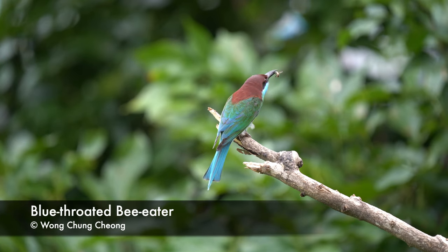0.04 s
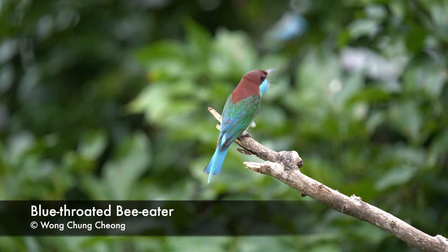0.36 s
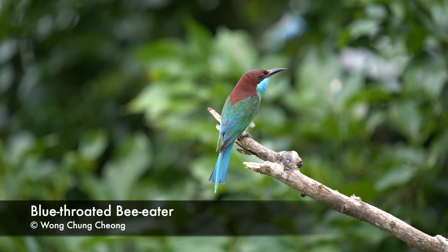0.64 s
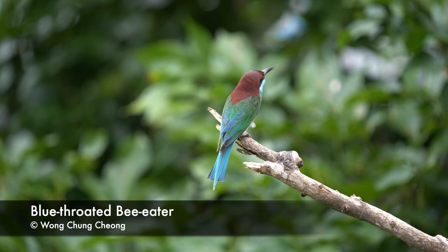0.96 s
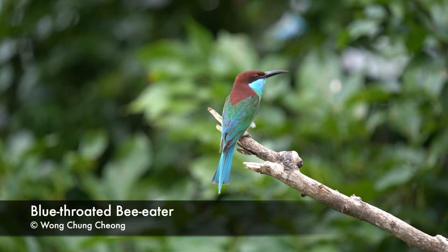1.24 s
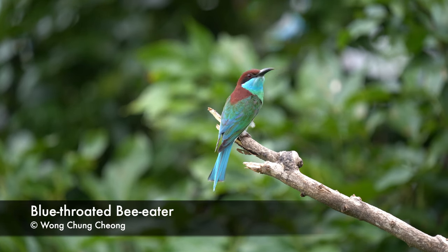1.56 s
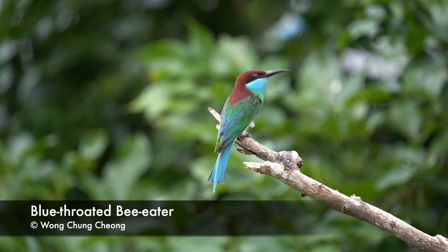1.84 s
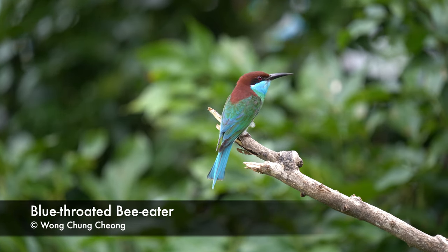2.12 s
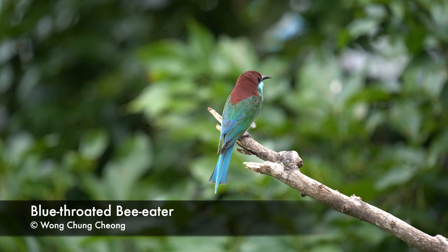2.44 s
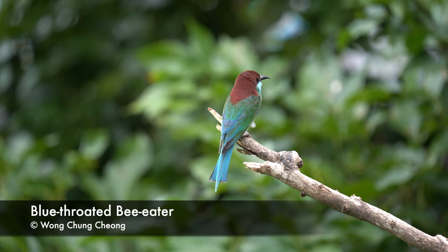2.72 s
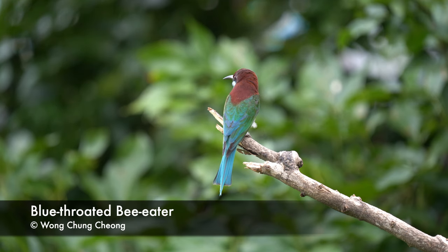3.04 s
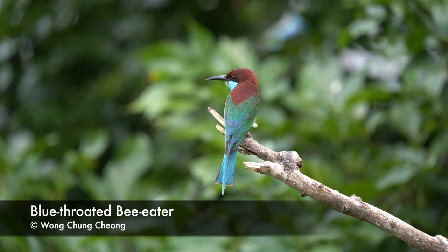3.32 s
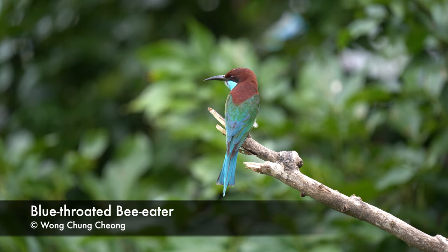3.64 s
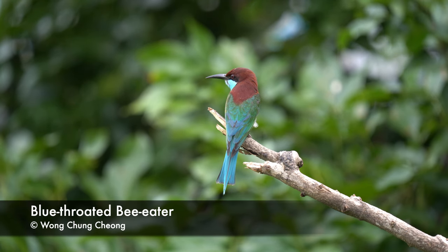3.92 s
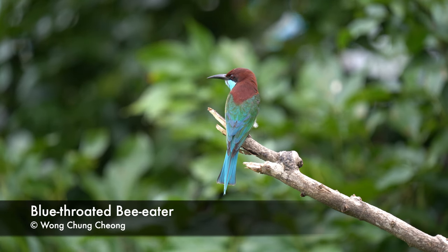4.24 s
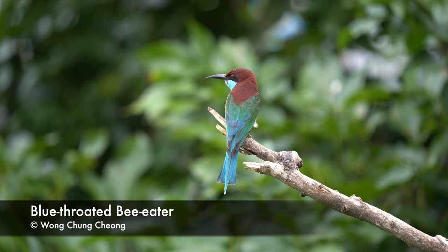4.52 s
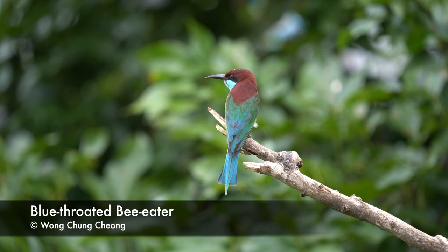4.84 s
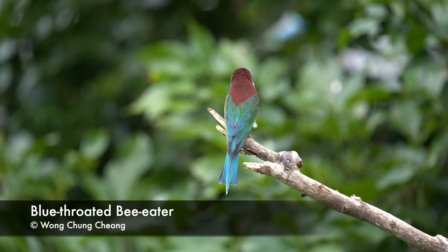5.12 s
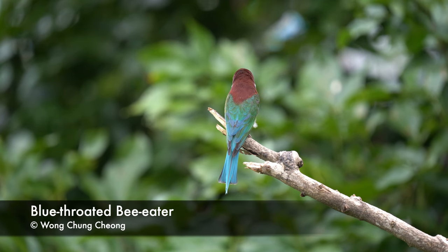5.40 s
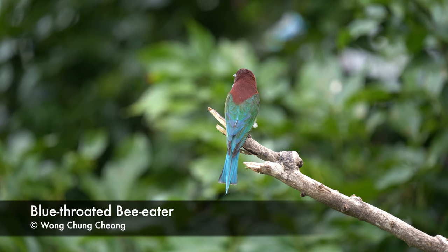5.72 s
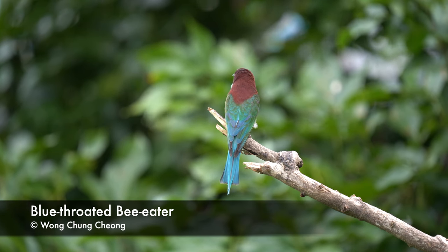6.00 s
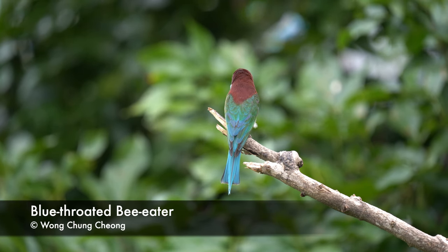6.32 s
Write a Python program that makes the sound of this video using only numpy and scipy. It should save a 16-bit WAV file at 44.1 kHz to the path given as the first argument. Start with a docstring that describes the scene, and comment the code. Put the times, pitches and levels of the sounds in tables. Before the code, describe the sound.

Distant traffic rumbles beneath a soft leafy hiss and shrill cicadas, while faint birds pip, trill and whistle among the trees.

```python
"""Distant traffic rumbles under a wash of road and foliage while cicadas buzz high up in a wooded park.
Two cicadas click their tymbals to ring their bodies; a chorus behind them merges into a hiss.
Birds trill, call thinly, pip, whistle slurred phrases, chirp, peep and twitter: each note is a
gliding near sine, echoed by trunks and leaves. Short fluttering swishes of noise come from the left,
the last a bird's squawk."""
import sys
import numpy as np
from scipy import signal
from scipy.fft import rfft, irfft
from scipy.io import wavfile

SR = 44100
rng = np.random.default_rng(int(sys.argv[2]) if len(sys.argv) > 2 else 0)


def inscribe(sig):
    """Save sig as 16-bit PCM at rate SR to the path in sys.argv[1].

    A 1-D sig is mono; a 2-D sig holds one channel per row.
    Samples are clipped to [-1, 1] before scaling.
    """
    pcm = np.round(np.clip(np.atleast_2d(sig).T, -1, 1) * 32767)
    wavfile.write(sys.argv[1], SR, pcm.astype(np.int16))


N = 289296
TIME_S = np.arange(N) / SR

# Diffuse background. Each row: frequency in Hz, left-right correlation.
DIFFUSE_CORRELATION = [(40, .9995), (85, .998), (170, .992), (350, .95), (700, .55), (1400, .14),
                       (3000, -.05), (5500, -.25), (9000, -.05), (15000, 0)]
# Its balance. Each row: frequency in Hz, left over right in dB.
DIFFUSE_BALANCE = [(60, 0), (180, -.3), (350, -2.3), (700, -4.4), (1400, -2.4), (3000, -1.8), (6000, -1),
                   (14000, 0)]
# Noise spectra of traffic, far wash and swishes. Each row: frequency in Hz, relative density in dB.
RUMBLE_SPECTRUM = [(18, -44), (24, -17), (33, -18), (39, 0), (50, -0.5), (80, -3), (110, -3), (150, -4.5),
                   (180, -9.5), (240, -13.5), (340, -17), (390, -24.5), (450, -31.5)]
WASH_SPECTRUM = [(250, -16.5), (450, 2.5), (700, -1), (1000, -4), (1500, -7.5), (2200, -11.5), (2900, -12),
                 (3600, -17.5), (4600, -17.5), (5600, -18), (7500, -20.5), (12500, -27.5), (15500, -29.5)]
SWISH_SPECTRUM = [(1000, -5), (2200, 8.5), (3800, 5), (5600, 6), (7000, 2), (10000, -13), (15000, -27)]
# Engines. Each row: frequency in Hz, width in Hz, level in dB.
ENGINE_DRONES = [(51.1, 0.86, -41.5), (73.16, 1.85, -38), (94.85, 2.6, -39.5), (202.7, 5, -50),
                 (350.2, 5.7, -57.5)]
# Far wash. Each row: time in seconds, relative level in dB.
WASH_ENVELOPE = [(0.05, -49.5), (0.99, -52), (4.68, -50), (6.12, -51), (6.38, -52.5), (6.4, -50)]
# Cicada body resonances. Each row: frequency in Hz, relative gain in dB.
STEADY_SPECTRUM = [(9900, -33), (10400, -1), (10800, -22), (11000, 1.5), (11180, 1.5), (11340, -6),
                   (11500, -1.5), (11800, -23), (12200, -38)]
SWELLING_SPECTRUM = [(7500, -23), (8100, -9), (8550, -12), (8800, -5), (9000, 2.5), (9300, -9.5),
                     (9900, -4), (10600, -30)]
CHORUS_SPECTRUM = [(8600, -27.5), (9300, -13), (9600, -6.5), (9800, -2), (10100, -9), (10500, -13),
                   (11300, -24.5), (12000, -37)]
# Swelling cicada. Each row: peak time in seconds, level in dB.
CICADA_SWELLS = [(.37, -57), (1.39, -56.5), (2.39, -56), (3.43, -57), (4.43, -57.5), (5.41, -58.5),
                 (6.41, -58.5)]
# Cicada chorus. Each entry: peak time of a surge in seconds.
SURGE_PEAKS_S = [.8, 1.97, 3.12, 4.15, 5.15, 6.2]
# Trills. Each row: start in seconds, number of ticks.
TRILL_RUNS = [(.089, 9), (3.21, 4)]
# Thin calls. Each row: start in seconds, length in seconds, pitch in Hz, level in dB, waver as a share.
THIN_NOTES = [(.18, .11, 5180, -68, .06), (.22, .07, 7080, -66, .012), (1.217, .04, 5490, -60, .025),
              (1.498, .21, 4840, -64, .1), (2.1, 0.2, 5000, -65, 0.072), (2.127, .07, 3630, -60.5, .025),
              (2.144, .055, 7270, -62, .012), (4.117, .08, 7050, -61, 0.037), (5.24, .13, 5100, -64, .06),
              (6.335, .04, 6760, -63, .008)]
# Swishes. Each row: peak time in seconds, Gaussian sigma in seconds, level in dB.
NOISY_SWISHES = [(.25, .08, -65), (1.58, 0.064, -76), (2.22, 0.036, -59), (3.066, 0.086, -53.5),
                 (3.37, 0.042, -52.5), (4.19, 0.066, -56), (4.723, 0.055, -48), (6.294, 0.079, -49)]
# Singer's falling notes. Each row: start in seconds, length in seconds, middle pitch in Hz,
# bow as a share of pitch, relative level in dB.
FALLING_NOTES = [(0.424, 0.036, 2630, .025, -53.5), (.49, 0.055, 2880, .01, -56),
                 (1.794, 0.056, 2710, 0.017, -53.5), (1.868, 0.056, 2910, 0.008, -58),
                 (2.324, 0.053, 2826, 0.029, -49), (3.104, 0.054, 2850, 0.022, -48.5),
                 (3.533, 0.086, 2790, 0.015, -54.5), (3.642, 0.052, 2950, .01, -54),
                 (3.822, .056, 2805, 0.023, -49), (4.04, .06, 2920, 0, -58.5),
                 (4.419, 0.04, 2930, -0.0018, -50), (4.719, 0.08, 2810, 0, -52),
                 (4.935, 0.059, 2774, .01, -43.5), (5.019, 0.0595, 2940, -0.026, -41.5),
                 (5.2, 0.038, 2640, .01, -52.5), (5.307, .1, 2790, 0.018, -45),
                 (5.435, .069, 2840, 0.026, -46), (5.65, 0.069, 2920, .025, -50.5)]
# Singer's rising notes, then the twitters. Each row: start in seconds, length in seconds,
# middle pitch in Hz, rise either side as a share of pitch, relative level in dB.
RISING_NOTES = [(2.288, .03, 2650, .04, -56), (4.302, 0.074, 2640, 0.036, -52),
                (4.385, .03, 2985, .015, -53), (4.9, 0.043, 2720, .04, -50), (4.994, 0.029, 2830, .05, -46),
                (5.236, 0.041, 2560, 0.021, -46), (5.29, 0.021, 3010, 0.13, -46.5),
                (5.405, 0.0364, 3000, .09, -46.5), (5.511, .04, 2876, 0.035, -50),
                (5.541, 0.049, 2740, 0.049, -45.5), (5.6, .06, 2730, .02, -53)]
TWITTER_NOTES = [(2.486, .035, 3050, 0.0034, -52), (2.53, 0.026, 2830, 0.1, -50),
                 (5.919, 0.064, 2757, -0.0091, -51.5), (6.234, 0.044, 2830, .07, -52.5),
                 (6.274, 0.0893, 1630, -.07, -50), (6.294, 0.015, 2640, .05, -45.5),
                 (6.319, 0.022, 4560, 0, -46), (6.333, 0.054, 3300, -0.044, -47.5),
                 (6.345, 0.113, 1630, .04, -53.5), (6.383, 0.041, 3130, 0, -56)]
# Chirps. Each row: start in seconds, top pitch in Hz, level in dB.
ARCHED_CHIRPS = [(0.559, 4230, -53), (0.873, 4220, -52.5), (1.259, 4150, -53), (2.719, 4230, -47.5),
                 (3.055, 4280, -50.5), (5.638, 4180, -51), (5.931, 4320, -51)]
# One chirp. Each row: share of length, share of top pitch, gain in dB.
CHIRP_CONTOUR = [(0, .87, -6), (.2, .97, -1), (.4, 1, 1), (.6, .96, 2), (.8, .86, -2), (1, .76, -7)]
# Peeps. Each entry: start in seconds.
PEEP_STARTS_S = [.762, 1.122, 1.917]


def from_db(db):
    return 10 ** (np.asarray(db) / 20)


def unit_rms(x):
    return x / np.sqrt(np.mean(x ** 2) + 1e-20)


def per_bin(points):
    """Interpolate onto the FFT bins over log frequency."""
    hz, value = np.transpose(points)
    return np.interp(np.log(np.maximum(np.fft.rfftfreq(N, 1 / SR), 1)), np.log(hz), value)


def colour(x, spectrum):
    """Filter by a spectrum, 40 dB down an octave past each end; rms 1."""
    low, high = spectrum[0], spectrum[-1]
    closed = [(low[0] / 2, low[1] - 40), *spectrum, (high[0] * 2, high[1] - 40)]
    return unit_rms(irfft(rfft(x) * from_db(per_bin(closed)), N))


def pan(left_db):
    return from_db(np.array([[left_db], [-left_db]]) / 2)


def arrive(x, left_lead_s):
    """Sound reaches the nearer microphone first."""
    phase_rad = np.pi * np.outer([1, -1], np.fft.rfftfreq(N, 1 / SR)) * left_lead_s
    return irfft(rfft(x) * np.exp(1j * phase_rad), N)


def drift(corner_hz, hop=32):
    """Low-passed noise, rms 1."""
    size = N // hop + 2
    hz = np.fft.rfftfreq(size, hop / SR)
    slow = unit_rms(irfft(rfft(rng.standard_normal(size)) / (1 + (hz / corner_hz) ** 2), size))
    return np.interp(np.arange(N) / hop, np.arange(size), slow)


def add(out, start_s, sound):
    i = max(round(start_s * SR), 0)
    out[:, i:i + sound.shape[-1]] += sound[..., :N - i]


def diffuse(spectrum):
    """Noise from all round: alike at both microphones in the bass, unrelated in the treble."""
    mid, side = rfft(rng.standard_normal((2, N)))
    correlation = np.clip(per_bin(DIFFUSE_CORRELATION), -1, 1)
    signs = np.array([[1], [-1]])
    pair = np.sqrt(1 + correlation) * mid + np.sqrt(1 - correlation) * side * signs
    balance = from_db(signs * per_bin(DIFFUSE_BALANCE) / 2)
    return colour(irfft(pair * balance, N), spectrum)


def traffic(rumble_db=-32.4):
    """Deep rumble with unsteady engine drones."""
    out = from_db(rumble_db) * diffuse(RUMBLE_SPECTRUM)
    for hz, width_hz, level_db in ENGINE_DRONES:
        phase_rad = 2 * np.pi * hz * TIME_S
        drone = drift(width_hz) * np.cos(phase_rad) + drift(width_hz) * np.sin(phase_rad)
        out += from_db(level_db) * unit_rms(drone)
    return out


def far_wash(gain_db=4.5):
    """Broad noise of far road and foliage."""
    level_db = np.interp(TIME_S, *np.transpose(WASH_ENVELOPE)) + gain_db
    return from_db(level_db) * diffuse(WASH_SPECTRUM)


def tymbal_buzz(body, pulse_hz, jitter_s, smear_db, left_db):
    """Each tymbal buckling clicks, slightly off the beat, and rings the body; foliage smears part."""
    beats_s = np.arange(0, N / SR, 1 / pulse_hz)
    clicks_s = beats_s + jitter_s * rng.standard_normal(len(beats_s))
    clicks = np.bincount(np.clip(clicks_s * SR, 0, N - 1).astype(int), minlength=N).astype(float)
    direct = unit_rms(arrive(clicks, left_lead_s=-94e-6))
    smear = from_db(smear_db) * rng.standard_normal((2, N))
    return pan(left_db) * colour(direct + smear, body)


def steady_cicada(hold_db=-59.5, rest_db=-80, resume_db=-67.5, recovery_db_per_s=8):
    """Even buzz on the right: holds, rests once, resumes softly and recovers."""
    stop_s, resume_s, switch_s = 5.295, 5.87, .04
    level_db = np.interp(TIME_S, [stop_s, stop_s + switch_s, resume_s, resume_s + switch_s],
                         [hold_db, rest_db, rest_db, resume_db])
    level_db += recovery_db_per_s * np.maximum(TIME_S - resume_s, 0)
    buzz = tymbal_buzz(STEADY_SPECTRUM, pulse_hz=144.1, jitter_s=20e-6, smear_db=-5, left_db=-13)
    return from_db(level_db) * buzz


def swelling_cicada(climb_db_per_s=9, fall_db_per_s=130):
    """Buzz on the right that climbs and breaks off about once a second."""
    swells_db = [db - np.maximum(climb_db_per_s * (s - TIME_S), fall_db_per_s * (TIME_S - s))
                 for s, db in CICADA_SWELLS]
    buzz = tymbal_buzz(SWELLING_SPECTRUM, pulse_hz=95.3, jitter_s=200e-6, smear_db=4, left_db=-7)
    return from_db(np.max(swells_db, axis=0)) * buzz


def cicada_chorus(base_db=-54, surge_db=2.5, sigma_s=.13):
    """Far clicks merge into a gently surging hiss."""
    surges = sum(np.exp(-.5 * ((TIME_S - s) / sigma_s) ** 2) for s in SURGE_PEAKS_S)
    hiss = pan(left_db=-6.2) * colour(rng.standard_normal((2, N)), CHORUS_SPECTRUM)
    return from_db(base_db + surge_db * surges) * hiss


def whistle(track_hz, waver, fade):
    """Near sine. Waver, a share of pitch, makes it rasp; fade is the tapered share of its length."""
    wobble = np.interp(np.arange(len(track_hz)) / SR, np.arange(128) / 500, rng.standard_normal(128))
    phase_rad = 2 * np.pi * np.cumsum(track_hz * (1 + waver * wobble)) / SR
    return signal.windows.tukey(len(track_hz), np.clip(fade, .1, 1)) * np.sin(phase_rad)


def slur(length_s, middle_hz, rise, bow, waver, fade):
    """Parabolic glide. Rise tilts it and bow lifts both ends, each as a share of the middle pitch."""
    anchors_hz = middle_hz * np.array([1 - rise + bow, 1, 1 + rise + bow])
    parabola = np.polyfit([0, .5, 1], anchors_hz, 2)
    return whistle(np.polyval(parabola, np.linspace(0, 1, int(length_s * SR))), waver, fade)


def perch(notes, left_db):
    """Place notes at one bearing. Each note: start in seconds, level in dB, sound."""
    out = np.zeros((2, N))
    for start_s, level_db, sound in notes:
        add(out, start_s, from_db(level_db) * pan(left_db) * sound)
    return out


def far_chatter(max_db=-61.5, spread_db=10, count=110, low_hz=2600, high_hz=3400):
    """Birds deep in the trees: faint slurs at random times, pitches and bearings."""
    out = np.zeros((2, N))
    for when, height, slope, loudness, side in rng.random((count, 5)):
        hz = low_hz * (high_hz / low_hz) ** height
        note = slur(.035, hz, rise=.183 * (.4 - slope), bow=0, waver=.011, fade=.55)
        level_db = max_db - spread_db * (1 - loudness)
        add(out, when * N / SR, from_db(level_db) * pan(left_db=16 * (side - .5)) * note)
    return out


def trilling_bird(hz=3370, period_s=.0383, last_db=-53, growth_db_per_s=16):
    """Runs of falling ticks that grow louder, on the left."""
    ticks = [(s + k * period_s, last_db - growth_db_per_s * period_s * (count - 1 - k),
              slur(.0214, hz, rise=-.059, bow=0, waver=.005, fade=.21))
             for s, count in TRILL_RUNS for k in range(count)]
    return arrive(perch(ticks, left_db=10), left_lead_s=120e-6)


def thin_callers():
    """Far, high, husky notes that creep upwards."""
    notes = [(s, db, slur(length_s, hz, rise=.02, bow=-.0096, waver=waver, fade=.38))
             for s, length_s, hz, db, waver in THIN_NOTES]
    return perch(notes, left_db=-6)


def pipping_bird(hz=3130, first_s=.231, period_s=.3144, count=15, base_db=-54, growth_db_per_s=1.04):
    """One small drooping arch, repeated evenly and slowly louder, on the left."""
    pips = [(s, base_db + growth_db_per_s * s,
             slur(.031, hz, rise=-.015, bow=-.052, waver=.002, fade=.37))
            for s in first_s + period_s * np.arange(count)]
    return arrive(perch(pips, left_db=2), left_lead_s=92e-6)


def swishes(flutter_db=2, flutter_hz=60, diffuse_db=1):
    """Short fluttering swishes of noise from the left, part diffuse; the last is a bird's squawk."""
    swell = sum(from_db(db) * np.exp(-.5 * ((TIME_S - s) / sigma_s) ** 2)
                for s, sigma_s, db in NOISY_SWISHES)
    direct = arrive(colour(rng.standard_normal(N), SWISH_SPECTRUM), left_lead_s=100e-6)
    around = from_db(diffuse_db) * diffuse(SWISH_SPECTRUM)
    swish = unit_rms(pan(left_db=1) * (direct + around))
    return swell * from_db(flutter_db * drift(flutter_hz)) * swish


def singing_bird(gain_db=.5, waver_per_rise=.31):
    """Clean falling whistles and rising notes that rasp more the further they rise, on the right."""
    falls = [(s, db, slur(length_s, hz, rise=-.0453, bow=bow, waver=.006, fade=.36))
             for s, length_s, hz, bow, db in FALLING_NOTES]
    rises = [(s, db, slur(length_s, hz, rise, bow=0, waver=waver_per_rise * rise, fade=.23))
             for s, length_s, hz, rise, db in RISING_NOTES]
    return from_db(gain_db) * arrive(perch(falls + rises, left_db=-5), left_lead_s=-34e-6)


def chirping_bird(length_s=.052, left_db=-12.5, lead_s=.061, lead_hz=5650, lead_gain_db=-6.5):
    """Husky high lead-in, then a quick rise and steep fall, on the right."""
    leads = [(s - lead_s, db + lead_gain_db, slur(.065, lead_hz, rise=0, bow=-.049, waver=.059, fade=.69))
             for s, _, db in ARCHED_CHIRPS]
    progress = np.linspace(0, 1, int(length_s * SR))
    share, pitch, gain_db = np.transpose(CHIRP_CONTOUR)
    bend = np.interp(progress, share, pitch)
    swell = from_db(np.interp(progress, share, gain_db))
    arches = [(s, db, swell * whistle(top_hz * bend, waver=.019, fade=.1))
              for s, top_hz, db in ARCHED_CHIRPS]
    return arrive(perch(leads, left_db / 2) + perch(arches, left_db), left_lead_s=-87e-6)


def peeping_bird(hz=2270, level_db=-52):
    """Single short low peeps, on the right."""
    peeps = [(s, level_db, slur(.025, hz, rise=0, bow=-.025, waver=.004, fade=.37))
             for s in PEEP_STARTS_S]
    return perch(peeps, left_db=-9)


def twittering_birds():
    """Scattered raspy notes on the left that crowd into one squeaky outburst."""
    notes = [(s, db, slur(length_s, hz, rise, bow=-.011, waver=.035, fade=.24))
             for s, length_s, hz, rise, db in TWITTER_NOTES]
    return arrive(perch(notes, left_db=9), left_lead_s=110e-6)


def tree_echoes(x, t60_s):
    """Trunks and leaves return many faint dying echoes, different at each microphone."""
    delay_s = np.arange(SR) / SR
    response = rng.standard_normal((2, SR)) * (rng.random((2, SR)) < .03) * (delay_s > .002)
    response *= from_db(-60 * delay_s / t60_s)
    response /= np.sqrt(np.sum(response ** 2, axis=1, keepdims=True))
    crossfed = 1.25 * x + .56 * x[::-1]
    return signal.fftconvolve(crossfed, response, axes=1)[:, :N]


def scene(branches_t60_s=.09, branches_db=-9, woods_t60_s=.64, woods_db=-11.5):
    """Birds and their echoes over cicadas, traffic and foliage."""
    near = singing_bird() + pipping_bird() + peeping_bird() + trilling_bird()
    far = chirping_bird() + thin_callers() + twittering_birds()
    send = near + from_db(3.5) * far   # distant birds arrive more by echo
    echoes = from_db(branches_db) * tree_echoes(send, branches_t60_s)
    echoes += from_db(woods_db) * tree_echoes(send, woods_t60_s)
    hidden = tree_echoes(far_chatter(), branches_t60_s)   # the furthest only by echo
    wash = far_wash()
    cicadas = steady_cicada() + swelling_cicada() + cicada_chorus()
    return near + far + echoes + hidden + wash + cicadas + traffic() + swishes()


def record(dry):
    """Steep low-pass."""
    cutoff_hz = 15750
    return signal.sosfilt(signal.ellip(12, .1, 80, cutoff_hz, fs=SR, output="sos"), dry)


dry = scene()
out = record(dry)
inscribe(out)
```